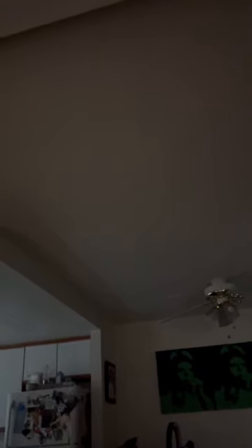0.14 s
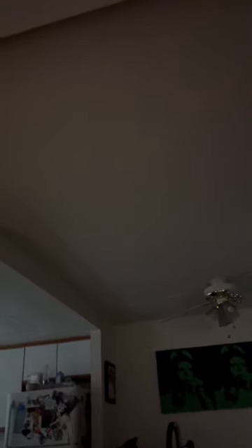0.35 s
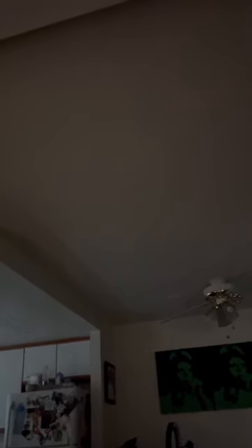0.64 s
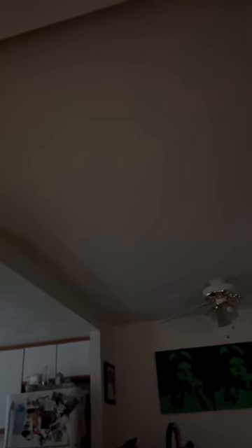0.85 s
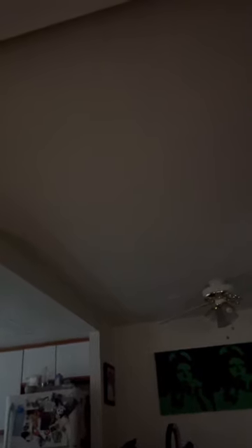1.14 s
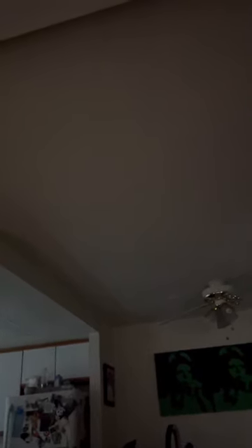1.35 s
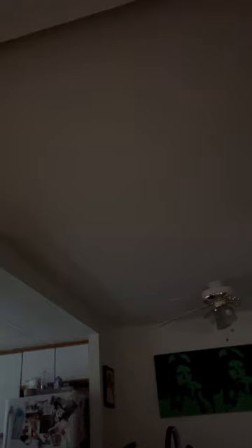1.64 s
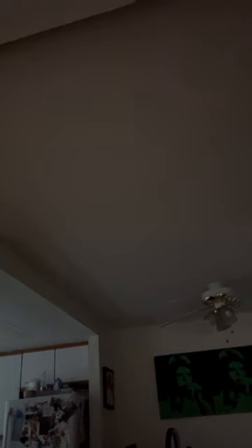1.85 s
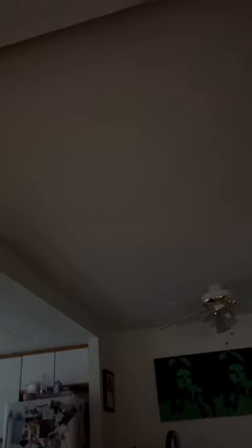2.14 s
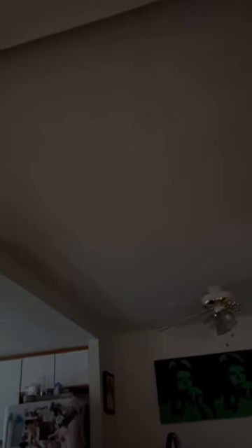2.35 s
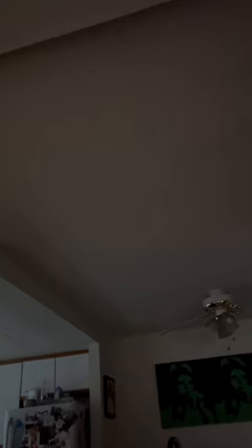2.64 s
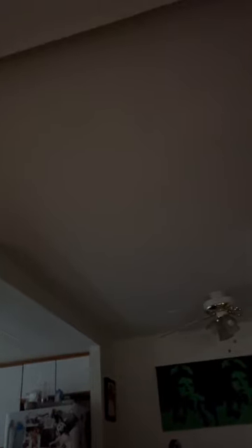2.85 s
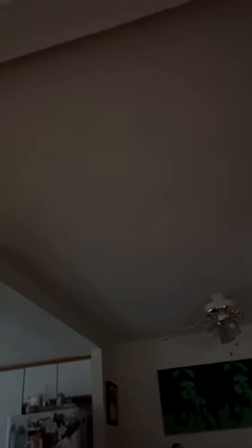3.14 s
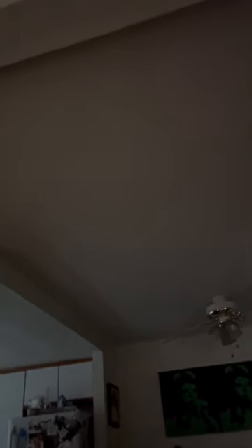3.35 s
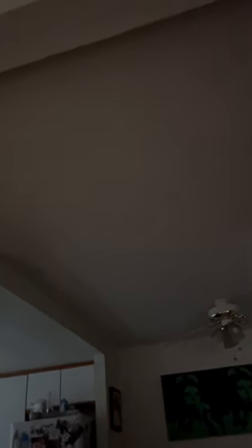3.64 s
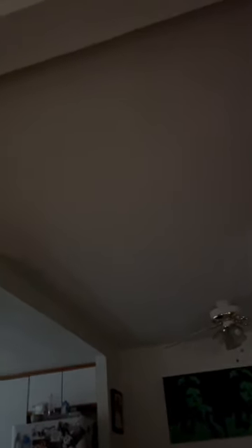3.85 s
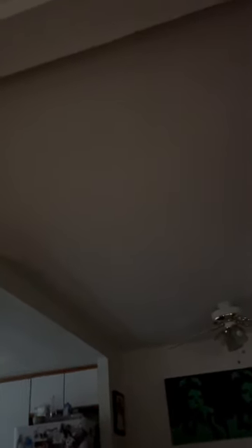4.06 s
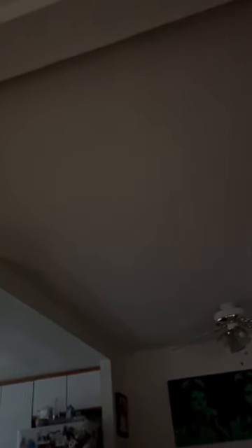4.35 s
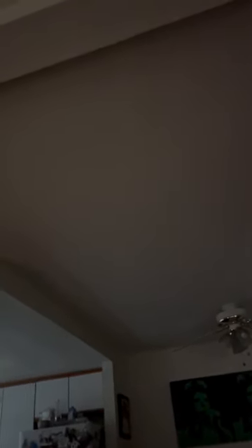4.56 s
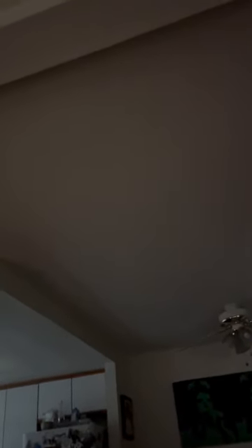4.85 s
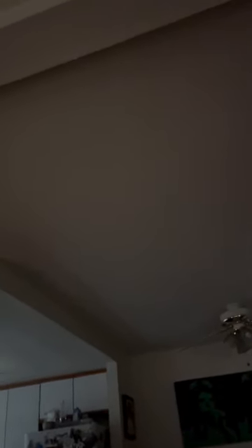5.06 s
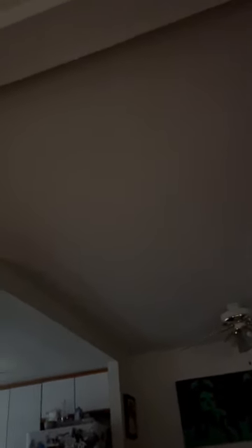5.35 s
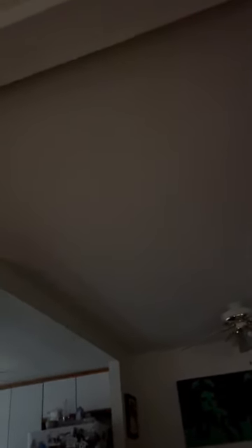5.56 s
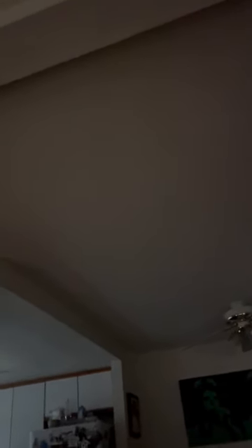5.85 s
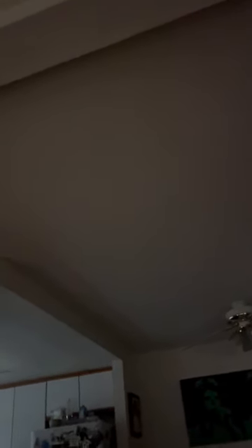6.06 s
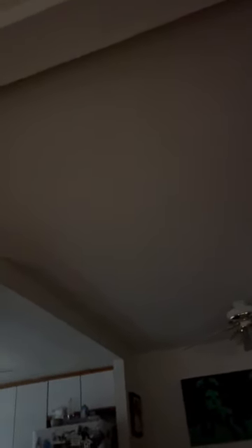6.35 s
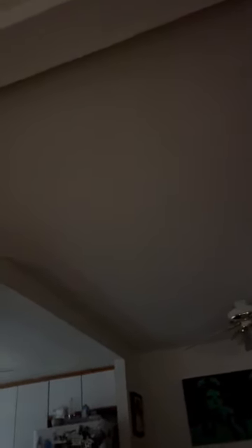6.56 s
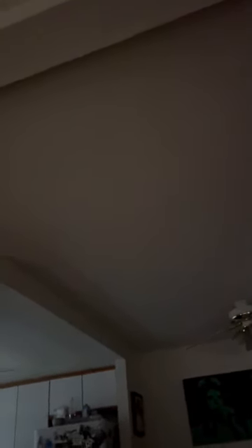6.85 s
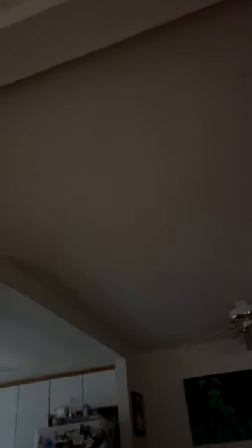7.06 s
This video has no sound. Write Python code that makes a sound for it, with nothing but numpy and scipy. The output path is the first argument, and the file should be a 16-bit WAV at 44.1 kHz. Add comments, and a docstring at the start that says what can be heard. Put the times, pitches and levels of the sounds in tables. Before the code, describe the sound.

Someone walks on the wooden floor upstairs: deep booming thuds, scattered knocks, a sudden board snap, then squeaky creaking near the end.

```python
"""A small, quiet room under a wooden floor, caught by a phone with two microphones below the ceiling.
Someone walks upstairs: heel-to-toe steps and flat footfalls push the floor and boom through its low modes.
Contacts on wood knock, a run of cracks snaps, a board rings, small things tick, and stick-slip boards creak.
A deep sine drone swells, sags and swells again; coloured noise gives the faint hiss and building rumble."""
import sys
import numpy as np
from scipy import signal
from scipy.fft import rfft, irfft, next_fast_len
from scipy.io import wavfile
from scipy.ndimage import uniform_filter1d

SR = 44100
rng = np.random.default_rng(int(sys.argv[2]) if len(sys.argv) > 2 else 0)


def store_wav(level_fs):
    """Save 16-bit WAV to argv[1]."""
    pcm = np.round(np.clip(np.atleast_2d(level_fs), -1, 1) * 32767)
    wavfile.write(sys.argv[1], SR, pcm.T.astype(np.int16))


N = 317157
TIME = np.arange(N) / SR
SIDES = np.array([[1], [-1]])  # opposite sign at the left and right microphone

# hollow ring of the floor structure: relative spectrum [f/Hz, level/dB]
HOLLOW = [(60, -24), (140, 4), (220, -6), (330, -4.5), (500, -8.5), (900, -14), (2500, -52.5)]


def undb(db):
    """Decibels to gain."""
    return 10 ** (np.asarray(db) / 20)


def unit(x):
    """Scale to rms 1."""
    return x / np.sqrt(np.mean(x ** 2))


def blow(x):
    """Scale a hit to the energy of 30 ms at rms 1."""
    return x / np.sqrt(np.sum(x ** 2) / (.03 * SR))


def along(points, hz):
    """Read (Hz, value) points on a log-frequency axis."""
    f, value = np.transpose(points)
    return np.interp(np.log(hz + 1e-3), np.log(f), value)


def colour(x, points, corner_hz=np.inf, peak_db=5, peak_share=0.79, peak_width=0.13, size=4096):
    """Causal filter to a spectrum; a springy contact resonates just under its corner, falling steeply above."""
    hz = np.fft.rfftfreq(size, 1 / SR)
    ratio = hz / corner_hz
    db = along(points, hz) + peak_db * np.exp(-.5 * ((ratio / peak_share - 1) / peak_width) ** 2)
    magnitude = undb(db) / np.sqrt(1 + ratio ** 6)
    # folding the cepstrum forward gives minimum phase: no sound ahead of the hit
    cepstrum = irfft(np.log(magnitude))
    cepstrum[1:size // 2] *= 2
    cepstrum[size // 2 + 1:] = 0
    response = irfft(np.exp(rfft(cepstrum)))
    return signal.fftconvolve(x, response)[:len(x)]


def ring(modes):
    """One second of damped modes (Hz, dB, t60 s), alternating in sign."""
    t = TIME[:SR]
    total = np.zeros(SR)
    for k, (hz, db, t60) in enumerate(modes):
        total += (-1) ** k * undb(db - 60 * t / t60) * np.sin(2 * np.pi * hz * t)
    return total


def add(track, s, x):
    """Mix x into the track from time s."""
    i = max(int(s * SR), 0)
    part = x[..., :N - i]
    track[..., i:i + part.shape[-1]] += part


def room(x, direct_db, spread=0.36, size=24000):
    """Direct sound plus a diffuse tail that differs between the microphones; treble dies first."""
    # reverberation time of the small room [f/Hz, t60/s]
    reverb_times = [(150, .6), (400, .44), (1200, 0.35), (3200, 0.35), (7000, 0.26), (13000, 0.18)]
    t, hz = TIME[:size], np.fft.rfftfreq(size, 1 / SR)
    common, apart = rfft(rng.standard_normal((2, size)))
    field = common + spread * apart * SIDES
    centres, t60s = np.transpose(reverb_times)
    tail = np.zeros((2, size))
    for band, t60 in zip(np.eye(len(t60s)), t60s):
        band_noise = irfft(field * along(np.c_[centres, band], hz))
        tail += band_noise * undb(-60 * t / t60)
    tail *= 1 - np.exp(-t / 0.0025)  # the walls answer a moment late
    tail /= np.sqrt(np.sum(tail ** 2) / 2)
    tail[:, 0] += undb(direct_db)  # direct sound relative to the tail
    return signal.fftconvolve(x[None], tail, axes=1)


def background(mid_db=-79.5, side_db=-79):
    """Even hiss, partly opposed between microphones, and building rumble that rises as walking starts."""
    # room hiss common to both microphones: relative spectrum [f/Hz, level/dB]
    air_mid = [(100, 0), (200, -5.5), (400, -11.5), (700, -17.5), (1300, -22), (2000, -24.5), (2800, -30),
               (4400, -24), (6200, -36), (8000, -29), (10500, -45), (12300, -32.5), (14000, -51.5)]
    # room hiss opposed between the microphones: relative spectrum [f/Hz, level/dB]
    air_side = [(100, -5), (260, -10), (500, -13.5), (1300, -18), (2400, -23.5), (4200, -31), (6000, -32),
                (8200, -43), (10200, -36), (13000, -51.5)]
    # the building's rumble over time [t/s, level/dB]
    rumble_level = [(0, -62.5), (.44, -71.5), (.6, -60), (7.19, -58)]
    # colour of the rumble: relative spectrum [f/Hz, level/dB]
    rumble_colour = [(15, -30), (30, -15.5), (45, -4.5), (61, 3), (75, -9.5), (105, -15.5), (150, -25.5),
                     (300, -39), (900, -54), (3000, -79)]
    mid, side, low = rng.standard_normal((3, N))
    hiss_mid = undb(mid_db) * unit(colour(mid, air_mid))
    hiss_side = undb(side_db) * unit(colour(side, air_side)) * SIDES
    rumble_gain = undb(np.interp(TIME, *np.transpose(rumble_level)))
    rumble = rumble_gain * unit(colour(low, rumble_colour, size=16384))
    return hiss_mid + hiss_side + rumble


def strike(t, db, corner_hz, body_db, ramp_db, scuff_db=-1, ramp_s=.0065, scuff_s=.0035):
    """A contact on wood at t = 0: a short noisy ramp, a click, a few ms of crunch and a hollow ring behind."""
    # spectrum of a hard knock on wood, relative [f/Hz, level/dB]
    wood_colour = [(100, -13.5), (300, -11.5), (550, -0.5), (900, -3), (1400, 2.5), (1950, -1.5),
                   (2450, -0.5), (3050, 1.5), (3600, 0.5), (4200, -1.5), (6000, -7), (8700, -2),
                   (10400, -14), (12300, -5), (15000, -8)]
    crunch, body = rng.standard_normal((2, len(t)))
    ramp = undb(ramp_db) * blow(crunch * (t < 0) * np.exp(-abs(t) / ramp_s))
    click = blow(signal.unit_impulse(len(t), np.argmin(abs(t))))
    scuff = undb(scuff_db) * blow(crunch * (t >= 0) * np.exp(-abs(t) / scuff_s))
    wood = undb(db) * blow(colour(ramp + click + scuff, wood_colour, corner_hz))
    hollow = blow(colour(body * (t >= 0) * np.exp(-abs(t) / .015), HOLLOW))
    return wood + undb(body_db) * hollow


def bend(x, lowest_hz=400, travel_s=.006):
    """Bending waves carry treble through the boards sooner than bass; travel_s is the 1 kHz travel time."""
    hz = np.fft.rfftfreq(len(x), 1 / SR)
    late_s = travel_s * np.sqrt(1000 / np.maximum(hz, lowest_hz))
    # delay relative to the fastest treble, summed over frequency into a phase
    cycles = np.cumsum(late_s - late_s[-1]) * hz[1]
    return irfft(rfft(x) * np.exp(-2j * np.pi * cycles), len(x))


def knocks(ramp_db=-8, near_db=-3, lead=700, size=4096):
    """Each knock has a short noisy ramp before its click and travels through the boards into the room."""
    # wooden knocks, levels ahead of the room [t/s, level/dB, brightness corner f/Hz, hollow body level/dB]
    knock_list = [(.484, -65.5, 6160, -58.5), (.502, -66, 4930, -60), (.532, -57.5, 3770, -66),
                  (1.707, -64.5, 7060, -63.5), (2.247, -80.5, 4540, -73.5), (2.795, -65, 3830, -65.5),
                  (3.362, -60, 2690, -60.5), (4.019, -60.5, 2520, -59), (4.777, -67.5, 3100, -63),
                  (4.903, -55.5, 2510, -58.5), (5.492, -68, 2920, -72), (5.811, -80.5, 5970, -91),
                  (6.148, -81, 3400, -72), (6.834, -74, 8650, -69), (6.906, -54.5, 3020, -68)]
    out, t = np.zeros((2, N)), TIME[:size] - lead / SR
    for s, db, corner_hz, body_db in knock_list:
        knock = bend(strike(t, db, corner_hz, body_db, ramp_db))
        add(out, s + t[0], room(knock, direct_db=near_db))
    return out


def pushes(thud_ms=13.85, walk_from_s=.5, stir_per_s=3.5, stir_db=-47, stir_scatter_db=4.5, count=40):
    """Pushes on the floor (s, dB, contact ms): rolling steps, flat footfalls, thuds, faint random stirring."""
    # full steps overhead, heel to ball to toe [t/s, force level/dB, heel contact/ms, time between contacts/s]
    steps = [(.487, -28.5, 2.5, .04), (4.892, -26, 5.6, 0.038), (5.528, -41.5, 2.8, .074),
             (6.177, -42.5, 2.8, 0.057)]
    # the three contacts of a step [relative force level/dB, contact time as a multiple of the heel's]
    roll = [(-1.5, 1), (1.5, 1.45), (-1.5, 1.6)]
    # flat, single footfalls [t/s, force level/dB, contact/ms]
    footfalls = [(1.211, -43.5, 6.5), (1.723, -34, 6), (2.82, -40, 8.6), (3.035, -41.5, 5.6),
                 (3.378, -34.5, 11.7), (4.03, -31, 12.7), (4.781, -38, 12), (6.841, -35, 6.8)]
    # soft thuds as the weight shifts [t/s, force level/dB]
    thuds = [(.672, -33.5), (.766, -35), (1.909, -32.5), (3.282, -38), (3.551, -38.5), (3.732, -37),
             (4.107, -36), (4.179, -35), (4.516, -47), (5.233, -39.5), (5.974, -42), (6.402, -40.5),
             (6.93, -32)]
    rolled = []
    for s, db, ms, roll_s in steps:
        for k, (part_db, softer) in enumerate(roll):
            rolled.append((s + k * roll_s, db + part_db, ms * softer))
    chance = rng.standard_normal((count, 2))
    times = walk_from_s + np.cumsum(np.exp(.3 * chance[:, 0])) / stir_per_s
    levels = stir_db + stir_scatter_db * chance[:, 1]
    stirs = [(s, db, thud_ms) for s, db in zip(times, levels) if s < TIME[-1]]
    return rolled + list(footfalls) + [(s, db, thud_ms) for s, db in thuds] + stirs


def thumps(build_s=0.012, hollow_db=-21):
    """Feet push the floor; a longer push leaves only the lowest modes, which take a moment to build."""
    # low modes of ceiling and room [f/Hz, relative level/dB, t60/s]
    ceiling_modes = [(40.3, -1.8, 0.16), (47.34, -7.5, 0.59), (60.8, 2, 0.56), (68.07, -11.5, 0.77),
                     (78.51, -13, 0.8), (87.7, -8, 0.55), (104.9, -5, 0.27), (140.4, -18.5, 0.23)]
    force = np.zeros(N)
    for s, db, contact_ms in pushes():
        sigma_s = contact_ms / 4000  # a contact spans four sigma
        push = np.exp(-.5 * np.minimum(((TIME - s) / sigma_s) ** 2, 100))
        force += undb(db) * push / push.sum()
    t = TIME[:SR]
    boom = ring(ceiling_modes) * (1 - np.exp(-t / build_s))
    dense_modes = unit(colour(rng.standard_normal(SR), HOLLOW)) * np.exp(-t / 0.094)
    return signal.fftconvolve(force, boom + undb(hollow_db) * dense_modes)[:N]


def rattles(board_s=2.962, board_db=-45, chatter_s=0.0094, size=2048):
    """Small loose things chatter as the room shakes, and a board rings on after the snap."""
    # a board set ringing by the snap [f/Hz, relative level/dB, t60/s]
    board_modes = [(593, 3, 0.27), (750, -15, 0.18), (920, -2.5, 0.32), (1396, 7, 0.12), (1524, -6, 0.4),
                   (1870, -2.5, 0.17), (2005, -0.5, 0.21), (3015, 4, 0.25), (3340, -3.5, 0.38),
                   (3610, -10, 0.35), (4400, -4.5, 0.37)]
    # ticks of small loose things, levels ahead of the room [t/s, level/dB]
    tick_list = [(.515, -74.5), (.557, -72), (4.259, -89.5), (4.967, -77), (6.835, -98)]
    # bright ring of the small things [f/Hz, relative level/dB, t60/s]
    trinket_modes = [(4980, -1.5, 0.016), (7800, -11, 0.0032), (11700, -5, 0.0049), (12750, -24, .005)]
    out = np.zeros((2, N))
    board = blow(ring(board_modes) * (1 - np.exp(-TIME[:SR] / 0.00059)))
    add(out, board_s, undb(board_db) * board)
    for s, db in tick_list:
        chatter = rng.standard_normal(size) * np.exp(-TIME[:size] / chatter_s)
        tick = blow(signal.fftconvolve(chatter, ring(trinket_modes)[:size]))
        add(out, s, room(undb(db) * tick, direct_db=1))
    return out


def swell(t, rise_s, length_s, swell_db=8, sag_db_per_s=62, release_db_per_s=285):
    """Creak level in dB: it swells from below, sags while the load eases, then lets go."""
    rise = -swell_db * np.maximum(1 - t / rise_s, 0)
    sag = -sag_db_per_s * np.maximum(t - rise_s, 0)
    outside = np.maximum(t - length_s, 0) + np.maximum(-t, 0)
    return rise + sag - release_db_per_s * outside


def creaks(slip_hz=108, jitter=.2, scatter_db=3, hiss_db=-12, squeak_db=-2, edge_db=-10, count=150,
           scrape_lead_s=.03):
    """Wood sticks and slips about 108 times a second, ringing one squeaky resonance over a dull scrape."""
    # board under a turning foot, levels ahead of the room
    # [t/s, swell/s, length/s, stick-slip level/dB, squeak f/Hz, share of bright rasp 0-2, scrape level/dB]
    creak_list = [(1.229, 0.033, 0.077, -88.5, 3500, 1, -81),
                  (4.219, 0.026, 0.021, -74.5, 3450, 0.26, -79.5),
                  (4.95, 0.021, 0.054, -73, 4820, 1, -79.5), (5.545, 0.01, 0.22, -66, 4420, 1.1, -72),
                  (5.828, 0.089, 0.24, -71.5, 4420, 1.3, -93.5), (6.313, 0.033, 0.033, -77, 4200, 1.5, -70),
                  (6.439, 0.039, 0.51, -91, 3500, 1, -81), (6.909, 0.035, 0.057, -67.5, 4200, 1, -68.5),
                  (7.019, 0.038, 0.21, -70, 3020, 0.13, -74.5)]
    # colour of the slips: relative spectrum [f/Hz, level/dB]
    slip_colour = [(300, -9.5), (1200, -21.5), (2000, -10), (2550, -2), (3050, 8.5), (3700, 6), (4500, 5.5),
                   (5300, -6.5), (7000, -17.5), (9500, -40), (14000, -22.5)]
    # colour of the sole's dull scrape: relative spectrum [f/Hz, level/dB]
    scrape_colour = [(80, -1.5), (200, 6.5), (400, 1), (900, -6), (1400, -6), (2200, -15), (4000, -31.5)]
    out = np.zeros((2, N))
    edge_band = signal.butter(3, [3800, 6000], "bandpass", fs=SR, output="sos")
    t = TIME[:SR // 2] - .1
    for s, rise_s, length_s, db, squeak_hz, bright, scrape_db in creak_list:
        resonance = ring([(squeak_hz, 0, .006)])
        slip_db = db + swell(t, rise_s, length_s)
        bright = np.clip(bright, 0, 2)
        chance = rng.standard_normal((count, 2))
        at = (np.cumsum(np.exp(jitter * chance[:, 0])) * SR / slip_hz).astype(int)
        inside = at < len(t)
        slips = np.zeros(len(t))
        slips[at[inside]] = undb(scatter_db * chance[inside, 1])
        friction = unit(slips) + undb(hiss_db) * rng.standard_normal(len(t))
        squeak = unit(signal.fftconvolve(friction, resonance)[:len(t)])
        rasp = bright * unit(colour(friction, slip_colour))
        rub = unit(undb(squeak_db) * squeak + rasp)
        # the sole scrapes just ahead of the creak
        scrape_gain = undb(scrape_db + swell(t + scrape_lead_s, rise_s, length_s))
        scrape = scrape_gain * unit(colour(rng.standard_normal(len(t)), scrape_colour))
        add(out, s + t[0], room(undb(slip_db) * rub + scrape, direct_db=-7.0))
        # the sharp edge of each slip arrives straight, unblurred by the walls
        edge = unit(signal.sosfilt(edge_band, slips))
        add(out, s + t[0], undb(slip_db + edge_db) * bright * edge)
    return out


def drone(drone_hz=59.9):
    """A nearly pure low tone swells, sags, swells again and dies away."""
    # deep drone, rms level over time [t/s, level/dB]
    drone_level = [(2.24, -57), (2.286, -46.5), (2.478, -37.5), (2.778, -43), (2.808, -51.5), (2.982, -45),
                   (3.04, -39.5), (3.124, -40.5), (3.17, -78)]
    s, db = np.transpose(drone_level)
    gain = uniform_filter1d(np.interp(TIME, s, undb(db), left=0, right=0), size=1000)
    return np.sqrt(2) * gain * np.sin(2 * np.pi * drone_hz * (TIME - s[0]))


def snap(first_s=2.953, gap_s=.0105, db=-47.5, corner_hz=7520, dulling=0.82, body_db=-64.5,
         ramp_db=-24, near_db=-3, count=3, size=4096):
    """Wood gives way in a quick run of cracks, each duller, without the boards' bending-wave delay."""
    out, t = np.zeros((2, N)), TIME[:size] - .015
    for k in range(count):
        crack = strike(t, db, corner_hz * dulling ** k, body_db, ramp_db)
        add(out, first_s + k * gap_s + t[0], room(crack, direct_db=near_db))
    return out


def scene():
    """Bass fills the room evenly; sharper sounds reach the two microphones out of step."""
    # phase by which the left microphone leads for sharp sounds [f/Hz, phase/rad]
    left_lead = [(100, -0.5), (1000, 1.13), (1500, 2), (1950, 1.66), (2300, 2.5), (2700, 3), (3200, 2),
                 (3700, 2), (4400, 1.45), (5300, 1.53), (6000, 2), (7200, 5.5), (8700, 7), (10300, 9),
                 (12000, 13), (15000, 10.5)]
    left, right = knocks() + snap() + rattles() + creaks()
    size = next_fast_len(N + SR)
    lag = np.exp(-1j * along(left_lead, np.fft.rfftfreq(size, 1 / SR)))
    sharp = np.array([left, irfft(rfft(right, size) * lag, size)[:N]])
    return sharp + thumps() + drone() + background()


def record(dry):
    """The phone cuts the top steeply above 14 kHz."""
    return signal.sosfilt(signal.ellip(8, .2, 70, 14000, fs=SR, output="sos"), dry)


dry = scene()
out = record(dry)
store_wav(out)
```